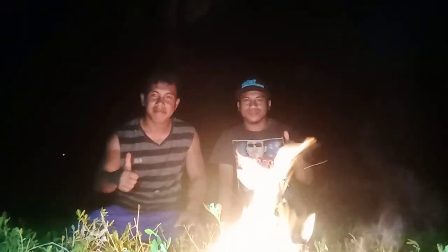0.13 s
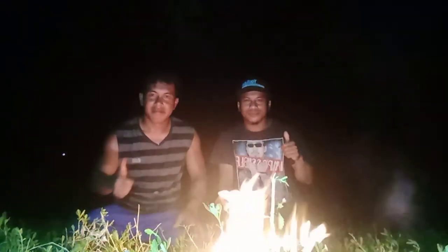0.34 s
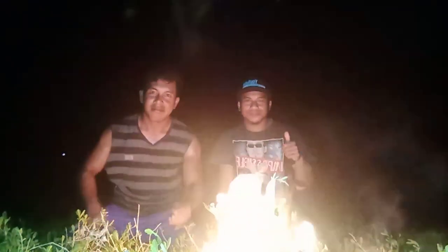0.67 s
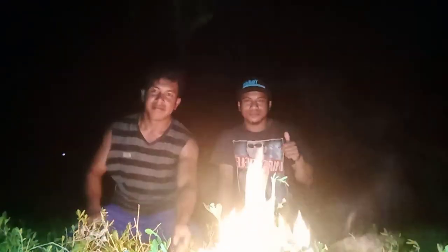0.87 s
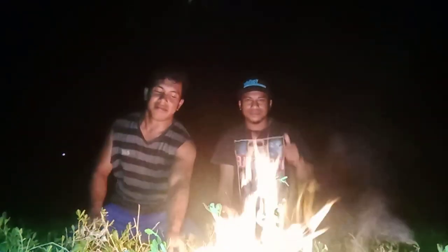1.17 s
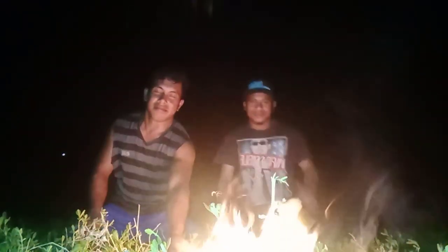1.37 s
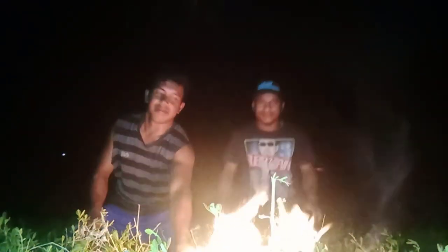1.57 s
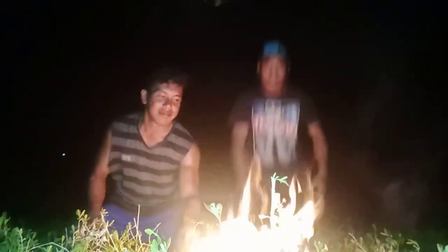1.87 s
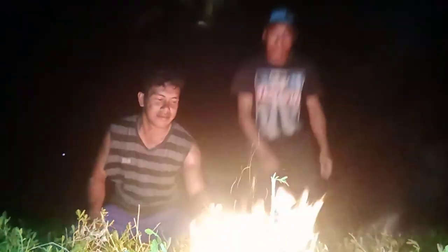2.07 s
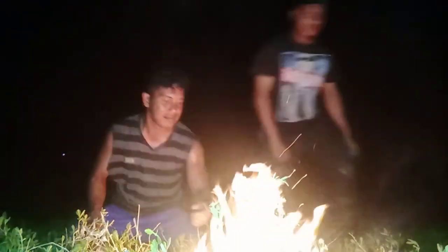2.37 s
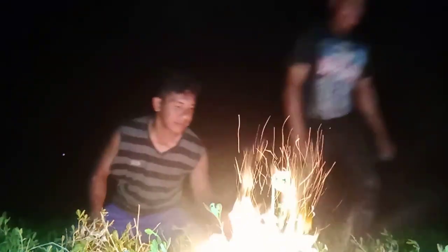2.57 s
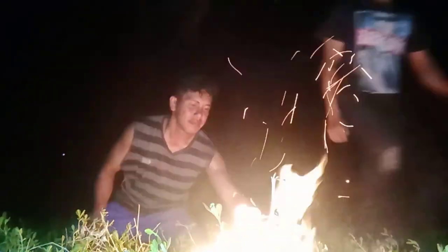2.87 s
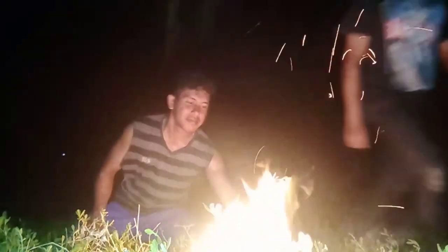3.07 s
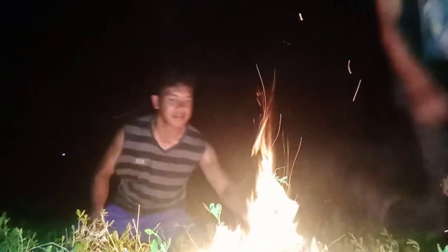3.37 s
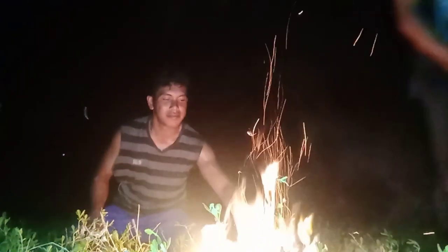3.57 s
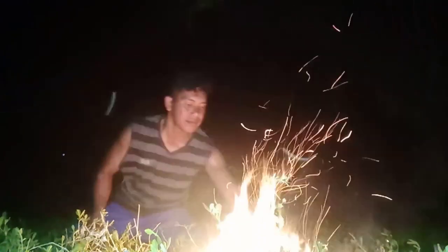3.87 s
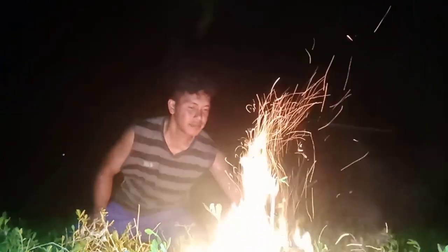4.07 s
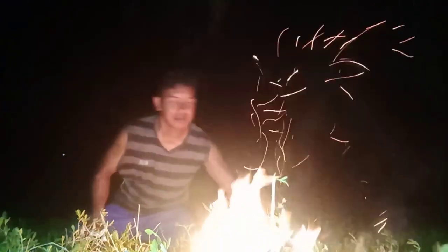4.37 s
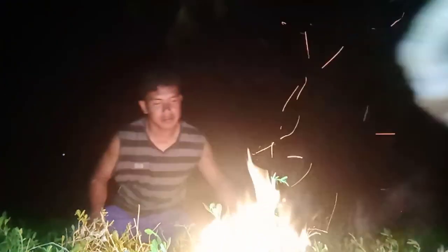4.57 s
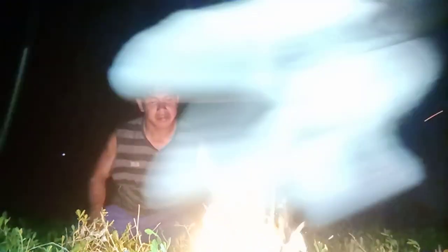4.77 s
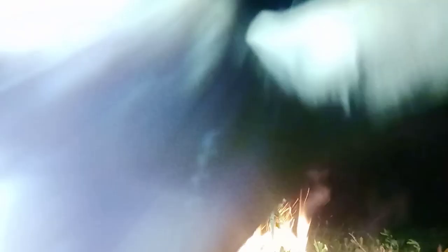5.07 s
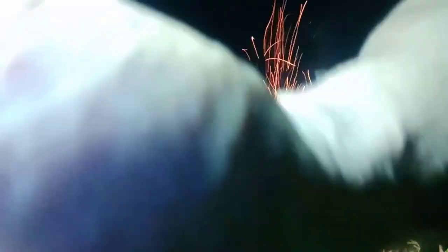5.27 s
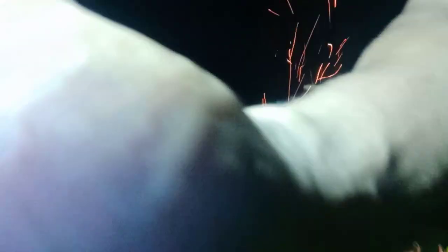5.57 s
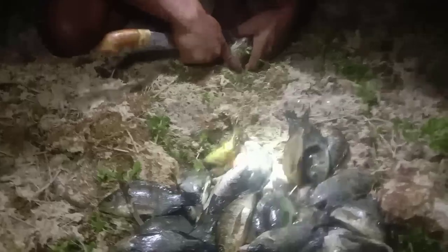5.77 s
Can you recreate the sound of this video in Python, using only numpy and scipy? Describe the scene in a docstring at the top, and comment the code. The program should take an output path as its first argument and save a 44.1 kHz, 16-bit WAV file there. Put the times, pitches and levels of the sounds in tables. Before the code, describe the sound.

A small grass and wood fire crackles close by with sharp pops and snaps while crickets and katydids sing steadily through the night.

```python
"""A grass and wood fire burns close to the microphone at night: stems burst as sharp pressure steps,
twigs snap as short rings, sap squeaks in gliding tones and sizzles in tiny crackles, and flames
flutter as resonant noise over a rumble. Crickets and katydids sing all around in gliding wing
strokes, pulsed buzzes and a noise chorus. Gain control ducks after the loudest bursts.
Near the end the sound stops dead, and the same night fades in again."""
import sys
import numpy as np
from scipy import signal
from scipy.fft import rfft, irfft
from scipy.io import wavfile
from scipy.ndimage import uniform_filter1d

SR = 44100
rng = np.random.default_rng(int(sys.argv[2]) if len(sys.argv) > 2 else 0)


def gain_from_db(level_db):
    """Convert decibel levels to linear amplitude factors (20 dB per decade)."""
    decades = np.asarray(level_db, float) / 20
    return 10 ** decades


def waveform_to_disk(signal):
    """Save audio, clipped to [-1, 1], as 16-bit WAV at the path in sys.argv[1]."""
    frames = np.transpose(np.atleast_2d(signal))
    scaled = np.clip(frames, -1, 1) * 32767
    samples = np.round(scaled).astype(np.int16)
    wavfile.write(sys.argv[1], SR, samples)


N = 261502
TIME = np.arange(N) / SR  # seconds


def evened(x):
    """Scales a sound to an rms of 1."""
    return x / np.sqrt(np.mean(x ** 2) + 1e-20)


def smooth_noise(size):
    """Slowly wandering noise of rms 1, averaged over size samples."""
    return evened(uniform_filter1d(rng.standard_normal(N), size=size))


def over_time(points):
    """Joins (time, value) points with straight lines."""
    return np.interp(TIME, *np.transpose(points))


def read(points, hz):
    """Reads a spectrum at the given frequencies, on a log frequency scale."""
    f, value = np.transpose(points)
    return np.interp(np.log(hz + 1), np.log(f + 1), value)


def coloured(x, points):
    """Filters a sound by a spectrum in dB."""
    spectrum = rfft(x) * gain_from_db(read(points, np.fft.rfftfreq(N, 1 / SR)))
    return irfft(spectrum, N)


def add(mix, s, sound):
    """Mixes a sound in, its middle at time s."""
    first = round(s * SR) - len(sound) // 2
    part = mix[first:][:len(sound)]
    part += sound[:len(part)]


def resonate(x, hz, width):
    """A resonance that can glide: shifts hz down to zero, smooths twice, and shifts back."""
    turn = np.exp(2j * np.pi * np.cumsum(hz * np.ones(N)) / SR)
    r = np.exp(-np.pi * width / SR)
    smooth = signal.lfilter([(1 - r) ** 2], [1, -2 * r, r ** 2], x / turn)
    return 2 * (turn * smooth).real


def patchy(tone, patch_db, flicker_db):
    """Noise whose spectrum has drifting patches and a flicker shared by all bands."""
    frames, hz = N // 128 + 5, np.fft.rfftfreq(512, 1 / SR)
    a, b, patches = rng.standard_normal((frames, 257, 3)).T
    patches = uniform_filter1d(patches, size=6, axis=0)  # across frequency
    patches = evened(uniform_filter1d(patches, size=12, axis=1))  # across time
    flicker = evened(uniform_filter1d(rng.standard_normal(frames), size=3))
    level_db = read(tone, hz)[:, None] + patch_db * patches + flicker_db * flicker
    z = (a + 1j * b) * gain_from_db(level_db)
    return evened(signal.istft(z, nperseg=512, noverlap=384)[1][:N])


def ring(hz, rise_ms, fall_ms, phase):
    """A short ring that swells and dies exponentially, peaking in the middle of its array."""
    ms = np.arange(-500, 500) / SR * 1000
    envelope = np.exp(np.where(ms < 0, ms / rise_ms, -ms / fall_ms))
    return envelope * np.cos(2 * np.pi * (hz * ms / 1000 + phase))


def stroke(from_hz, to_hz, ms):
    """A gliding tone that swells and fades, as from one stroke of an insect's wing."""
    size = round(ms * SR / 1000)
    cycles = np.cumsum(np.linspace(from_hz, to_hz, size)) / SR
    return np.hanning(size) * np.sin(2 * np.pi * (cycles + rng.random()))


# Bursting stems, the rows at 3.1229 and 3.1257 s being faint echoes of the burst at 3.1163 s: (time [s],
# strength [dB], wait until the pressure swings back [ms], size of the swing back [share of the first step])
STEM_BURSTS = [(.9240, 1, .31, .68), (2.0108, -5.5, .18, 1), (2.0181, .5, .15, .69),
               (3.1163, 1.2, .315, .71), (3.1229, -13, .3, .7), (3.1257, -9, .2, .7)]


def bursts():
    """A sharp pressure step and its swing back, each a spike ringing in the microphone port over a slower body."""
    out = np.zeros(N)
    spike = 0.35 * ring(4700, .07, .14, 0)
    body = 0.45 * ring(300, .1, 0.36, 0)
    port = .045 * ring(14900, .2, .3, 0)
    step = spike + body + port
    for s, db, ms, back in STEM_BURSTS:
        add(out, s, -gain_from_db(db) * step)
        add(out, s + ms / 1000, back * gain_from_db(db) * step)
        add(out, s + .001, gain_from_db(db - 27.5) * ring(2420, 0.41, 1.9, 0))  # the stick rings on
        add(out, s + 0.0046, gain_from_db(db - 32.5) * ring(150, 4.2, 2.2, 0))  # the ground booms
    return signal.lfilter(*signal.butter(2, 70, "high", fs=SR), out)  # the pressure evens out


# Snaps at set times, loud and faint: (time [s], strength [dB], slowness that lengthens ring and
# tearing [ms], thump relative to the ring [dB], tick relative to the ring [dB])
TIMED_SNAPS = [(.0833, -31.5, .33, -25, -21), (.1152, -29, 1.12, -44, -30), (.1648, -28, .24, -28.5, -6.5),
               (.2446, -43, 1.3, -44, -5), (.506, -41, 0.87, -39, 2), (.7134, -47, 0.48, -39, 17),
               (.7179, -30, 0.29, -44, 11), (.72, -35.5, .3, -42, 12.5), (.7284, -28, 0.61, -43, -5),
               (.731, -38, 0.69, -43, 13.5), (1.606, -27, 0.54, -25, -12), (1.6587, -28, 0.82, -49, -21),
               (1.6653, -31.5, 0.6, -55, -17), (1.7796, -37, .43, -44.5, -20),
               (1.8411, -28.5, 1.14, -49, -4.5), (1.9526, -31.5, 0.35, -46, -29),
               (2.0083, -26.5, 0.46, 5, 6.5), (2.0203, -36, 0.35, 10, -33), (2.0766, -32, .29, -15.5, -10),
               (2.2552, -22.5, 0.93, -55, -11), (2.258, -29, 0.84, -49, -8), (2.2769, -41, 1.1, -38, -4),
               (2.302, -24.5, 0.55, -38, -21), (2.3216, -26.5, .23, -7, 3), (2.3289, -13, 0.057, -12, -7.5),
               (2.5588, -59.5, .2, -28, 24), (2.5701, -53, .23, -25, 14), (3.0352, -34, 0.28, -21, -24),
               (3.0651, -27, 0.66, -22, -31), (3.0751, -25, 0.37, -19, -27),
               (3.0916, -25.5, 0.93, -19, -12), (3.1795, -17.5, 0.98, -44, -25),
               (3.2041, -8, 0.41, -40, -40), (3.2098, -16.5, 0.43, -35.5, -22),
               (3.3968, -29, 0.96, -51, -11), (3.4874, -27.5, 1, -37, -9), (3.5444, -59, 0.68, -3, -17),
               (3.561, -52, 0.58, -5, -33), (3.6414, -33, 0.5, -29, -28), (3.7474, -28.5, 2.1, -18.5, -36),
               (3.8181, -31, 0.41, -42, -28), (3.8658, -35, .33, -26, 1), (3.871, -18, .23, -22, 4),
               (3.878, -11.5, 0.18, -14.5, -3.5), (3.8788, -8, 0.62, -49, -33),
               (3.887, -24, 0.27, -34, -17), (3.8961, -23.5, 0.46, -53, -9), (4.0113, -8.5, 0.13, -61, -20),
               (4.0153, -22.5, 0.37, -58, 0), (4.109, -17, 0.75, -44, -35), (4.1459, -24.5, .7, -43, -29),
               (4.3046, -6.5, 0.71, -5.5, -42), (4.3077, -6, 0.96, -14, -10), (4.3112, -13, 1.2, -10, -47),
               (4.3137, -17, 2.3, -27, -43), (4.3245, -20, 3, -11.5, -34), (4.3423, -46, 2.1, -2, -23),
               (4.3898, -25, 0.58, -20, -6), (4.407, -31, 0.69, -5, -2), (4.4764, -43, .24, -33, 2),
               (4.5463, -23.5, 0.28, -28, -8), (4.628, -26, .64, -52, -9), (4.647, -37, .35, -41, -28),
               (4.711, -41, .32, -40, 3), (4.8306, -33, 3.6, -14, -26), (4.87, -23, .74, -13, -50),
               (4.8737, -27.5, 3, -8, -27), (4.9735, -35.5, 2.2, -14, -23), (4.978, -31.5, 1.56, -7.5, -12),
               (5.0098, -32, 2.8, -16, -10), (5.192, -36.5, .3, -10, -16), (5.343, -32, 1.9, -18.5, -3.5),
               (5.38, -34, 2.6, -39, -37), (5.3867, -28, 1.74, -50, -15), (5.615, -20, 0.12, -31, -7.5),
               (5.619, -24.5, 0.42, -32, -12.5), (5.8719, -39, .92, -28, -14),
               (5.9082, -29.5, 0.6, -27, -11)]
# How sticks ring in a thump: (frequency [Hz], highest level within the thump [dB], decay [ms])
STICK_RINGS = [(430, -12.5, 1.1), (666, -6, 1.1), (1050, -8.5, .15), (1740, -5.5, 0.15), (2510, 3, 0.66)]
SNAP_HZ, SNAP_SPREAD_HZ = 5700, 1000  # middle and full width of the range in which fibres ring


def snaps():
    """Each snap is a thump in the sticks, a ring and a thin tick; slow ones tear as a rasp of many fibres."""
    out = np.zeros(N)
    rows = TIMED_SNAPS + chance_snaps()
    draws = zip(rng.random((len(rows), 13)), rng.standard_normal((len(rows), 1000)))
    for (s, db, ms, thump_db, tick_db), (luck, fibres) in zip(rows, draws):
        hz = SNAP_HZ + SNAP_SPREAD_HZ * (luck[12] - .5)
        snap = ring(hz, 0.14 + .05 * ms, 0.14 + 0.048 * ms, luck[10])
        for k, (wood_hz, wood_db, wood_ms) in enumerate(STICK_RINGS):
            level_db = thump_db + wood_db - 10 * luck[k + 5]
            snap += gain_from_db(level_db) * ring(wood_hz, 0.21, wood_ms, luck[k])
        port = .5 * gain_from_db(0.91 * min(tick_db, 8))  # bright ticks ring the microphone port harder
        tick = port * ring(14800, .2, 0.353, luck[11]) + 0.58 * ring(10300, .07, 0.084, luck[11])
        snap += gain_from_db(tick_db) * tick
        tearing = np.clip(1.14 * (ms - .35), 0, 1)  # 0 is one clean break, 1 is a full rasp
        breaks = fibres * ring(0, .3 * ms, 1.2 * ms, 0)  # at 0 Hz the ring is a plain envelope
        breaks *= tearing * np.sqrt(3 * ms) / np.linalg.norm(breaks)
        breaks[500] += 1 - .9 * tearing  # the main break, in the middle
        add(out, s, gain_from_db(db) * signal.fftconvolve(snap, breaks, "same"))
    # a noisy tail that falls 60 dB in 20 ms
    trail = rng.standard_normal(1500) * gain_from_db(-60 * np.arange(1500) / SR / 0.02)
    out = out + gain_from_db(-31.5) * signal.oaconvolve(out, trail)[:N]
    return signal.lfilter(*signal.butter(2, 120, "high", fs=SR), out)  # thin sticks push little bass


CHANCE_SNAPS = 60  # how many
CHANCE_DB, CHANCE_SPREAD_DB = -36.5, 9  # middle strength in a middling fire, full width of the spread
CHANCE_FOLLOW = .4  # dB of strength per dB of sizzle


def chance_snaps():
    """Rows for the many other snaps, at chance moments and of chance colour, stronger with the sizzle."""
    when, size, ms, thump, tick = rng.random((CHANCE_SNAPS, 5)).T
    s = .02 + when * (N / SR - .04)
    db = CHANCE_DB + CHANCE_FOLLOW * activity_db(s) + CHANCE_SPREAD_DB * (size - .5)
    return list(zip(s, db, 0.46 + 0.4 * ms ** 2, -45 + 30 * thump, -28 + 20.1 * tick))


# Sap squeaking out of hot wood: (time [s], length [ms], start pitch [Hz], end pitch [Hz],
# level before the sputter [dB])
SAP_SQUEAKS = [(1.968, 36, 3750, 3270, -54.5), (1.976, 71, 2550, 2400, -58), (2.435, 19, 2990, 3300, -50),
               (2.454, 20, 3265, 3460, -43.5), (2.476, 17, 3580, 3470, -50.5),
               (3.075, 11, 1320, 1200, -45.5), (3.554, 30, 2560, 2480, -55), (3.560, 42, 1156, 1310, -61)]


def squeaks():
    """Short gliding whistles, chopped by sputtering steam."""
    out = np.zeros(N)
    for s, ms, from_hz, to_hz, db in SAP_SQUEAKS:
        add(out, s, gain_from_db(db) * stroke(from_hz, to_hz, ms))
    return out * (.6 + 0.53 * smooth_noise(70))


# Sap and grass sizzling: (time [s], level before the 11 dB lift in sizzle() [dB])
SIZZLE_LEVEL = [(0, -83), (1.3, -85), (1.75, -76), (2.15, -75.5), (2.31, -64), (2.4, -69.5), (2.55, -76),
                (2.68, -67.5), (2.9, -78.5), (3.06, -63.5), (3.2, -51.5), (3.32, -71.5), (3.68, -58),
                (4, -69.5), (4.24, -56.5), (4.48, -64), (4.6, -63), (4.82, -54.5), (4.94, -63.5),
                (5.05, -62.5), (5.28, -77.5), (5.36, -63.5), (5.52, -85), (5.93, -72)]
# Colour of the sizzle: (frequency [Hz], relative level [dB])
SIZZLE_COLOUR = [(410, -42), (700, -14.5), (931, -21), (1270, -20), (1850, -22), (2430, -12), (3360, -9),
                 (4830, -4), (5640, -4), (6500, -4.5), (8000, -18), (12400, -30), (15500, -28)]


def sizzle():
    """Tiny crackles, a few of them large, over the hiss of steam."""
    size = gain_from_db(5 * np.minimum(rng.exponential(1, N), 4))
    size = size * (rng.random(N) < 2500 / SR)  # about 2500 crackles a second
    kind, crackle = rng.integers(0, 12, N), np.zeros(N)
    for k in range(12):
        grain = ring(rng.uniform(2500, 14000), 0.12, rng.uniform(0.072, 0.28), rng.random())
        crackle += signal.oaconvolve(size * (kind == k), grain)[:N]
    crackle = evened(coloured(crackle, SIZZLE_COLOUR))
    steam = patchy(SIZZLE_COLOUR, 2.5, 1.5)
    spits = gain_from_db(2.2 * smooth_noise(2500))  # the level wanders
    return gain_from_db(over_time(SIZZLE_LEVEL) + 11) * spits * (.75 * crackle + .66 * steam)


def activity_db(s):
    """How far the sizzle is above or below a middling fire at time s."""
    return np.interp(s, *np.transpose(SIZZLE_LEVEL)) + 65


# Gas puffs: (time of the peak [s], length [ms], pitch [Hz], peak level [dB])
GAS_PUFFS = [(.13, 86, 514, -80), (1.945, 96, 451, -62), (2.25, 210, 448, -77), (2.41, 80, 483, -74),
             (3.03, 44, 580, -73), (3.25, 27, 360, -61), (3.548, 59, 511, -63), (3.64, 67, 430, -64),
             (3.75, 42, 404, -55), (3.83, 75, 554, -72), (4.21, 210, 522, -62.5), (4.35, 120, 665, -66.5),
             (4.54, 110, 556, -68), (4.795, 40.4, 372, -52), (4.87, 80, 402, -62), (5.85, 136, 560, -69.5)]
PUFF_RISE = .4  # rise time as a share of the fall time
MURMUR_DB, MURMUR_FOLLOW = -78, .6  # flutter between puffs in a middling fire; dB per dB of sizzle
# Flame rumble: (time [s], level [dB])
RUMBLE_LEVEL = [(0, -68.5), (.8, -73), (1.9, -69), (2.5, -69.5), (3.3, -66.5), (4, -73.5), (4.4, -69.5),
                (5.2, -69), (5.93, -72)]
# Colour of the rumble: (frequency [Hz], relative level [dB])
RUMBLE_COLOUR = [(15, -59.5), (25, -22), (37, -11), (109, 0.5), (267, -13.5), (350, -17), (389, -22.5),
                 (900, -35), (1170, -67), (1980, -120)]


def flames():
    """A lumpy rumble, and a hollow flutter where gas puffs out between the sticks."""
    s, ms, hz, db = np.transpose(GAS_PUFFS)
    level = gain_from_db(MURMUR_DB + MURMUR_FOLLOW * activity_db(TIME))
    for at, length, peak in zip(s, ms / 1000, gain_from_db(db)):
        width = length * np.where(TIME < at, PUFF_RISE, 1)
        level = level + peak * np.exp(-(2 * (TIME - at) / width) ** 2)
    pitch = np.interp(TIME, s, hz) + 40 * smooth_noise(2000)  # Hz, wandering
    unsteady = gain_from_db(4 * smooth_noise(350))
    flutter = evened(unsteady * resonate(rng.standard_normal(N), pitch, 170))
    lumps = gain_from_db(1.4 * smooth_noise(1500))
    slow = uniform_filter1d(uniform_filter1d(rng.standard_normal(N), size=3000), size=2000)
    gusts = gain_from_db(3 * evened(slow))
    rumble = evened(gusts * lumps * coloured(rng.standard_normal(N), RUMBLE_COLOUR))
    return gain_from_db(over_time(RUMBLE_LEVEL)) * rumble + level * flutter


# Near cricket: (time of the first stroke [s], strokes [count], middle level [dB])
NEAR_CHIRPS = [(0.116, 3, -50.5), (0.304, 6, -52), (.518, 3, -53.5), (.646, 3, -52), (.792, 3, -51.5),
               (1.092, 3, -48.5), (1.230, 3, -51), (1.346, 2, -52), (1.473, 3, -51.5), (1.681, 3, -51),
               (1.883, 3, -51), (2.129, 3, -48.5), (2.302, 3, -46.5), (2.491, 3, -47.5), (2.686, 3, -50.5),
               (2.886, 3, -53), (3.245, 5, -51.5), (3.444, 3, -53), (3.644, 3, -46.5), (3.850, 3, -64),
               (4.063, 3, -46.5), (4.768, 3, -64), (5.08, 4, -50), (5.269, 3, -50), (5.500, 3, -51),
               (5.809, 4, -52.5)]


def near_cricket():
    """Chirps made of wing strokes 35 ms apart, each falling in pitch."""
    out = np.zeros(N)
    for s, strokes, db in NEAR_CHIRPS:
        for k in range(round(strokes)):
            add(out, s + 0.035 * k, gain_from_db(db + rng.normal(0, 1.6)) * stroke(5150, 4410, 22))
    return out


# High cricket: (time [s], stroke pairs sung so far [count])
PAIR_COUNT = [(.029, 0), (1.013, 15), (1.536, 23), (1.991, 30), (2.528, 38), (2.986, 45), (5.239, 80),
              (5.955, 91)]


def high_cricket():
    """Rising wing strokes in pairs, 16.5 ms from one stroke to its partner."""
    out = np.zeros(N)
    s, pairs = np.transpose(PAIR_COUNT)
    for start in np.interp(np.arange(91), pairs, s):
        db = -55.5 + rng.normal(0, 3)
        for lag in (0, .0165):
            add(out, start + lag, gain_from_db(db + rng.normal(0, 1)) * stroke(6800, 7250, 10))
    return out


# Steady buzzers: (pitch [Hz], width [Hz], pulse rate [per s], time of one pulse [s],
# pulse sharpness [no unit], level before any swell [dB])
BUZZING_INSECTS = [(2400, 90, 250, -0.027, 0.89, -76), (14700, 510, 66, -0.013, 1.0, -79)]
# Swell of the low buzzer: (time [s], level change [dB])
LOW_BUZZ_SWELL = [(0, -4.5), (1.3, -5.5), (1.55, 3.5), (1.9, -5), (2.15, -14.5), (3.5, 1.5), (5.5, -2.5),
                  (5.75, 2.5)]


def buzzers():
    """Noise in regular pulses rings a narrow resonance; only the low buzzer swells."""
    out = np.zeros(N)
    for hz, width, rate, first, sharp, db in BUZZING_INSECTS:
        beat = np.exp(sharp * np.cos(2 * np.pi * rate * (TIME - first)))
        swell_db = over_time(LOW_BUZZ_SWELL) * (hz < 8000)
        out += gain_from_db(db + swell_db) * evened(resonate(beat * rng.standard_normal(N), hz, width))
    return out


def neighbours():
    """500 single falling strokes at chance moments, from crickets further off."""
    out = np.zeros(N)
    for s in rng.uniform(.02, N / SR - .03, 500):
        from_hz, to_hz = rng.normal(0, 300) + np.array([5500, 4850])
        add(out, s, gain_from_db(-59 + rng.normal(0, 1.7)) * stroke(from_hz, to_hz, 20))
    return out


# Colour of the far insects: (frequency [Hz], relative level [dB])
CHORUS_COLOUR = [(350, -63), (600, -36), (1670, -33), (1940, -41), (2380, -19), (2800, -24.5),
                 (3730, -20.5), (4900, 0.5), (5310, -2), (7270, -11), (8000, -16), (8800, -12.5),
                 (10900, -33.5), (13400, -38), (15600, -26)]


def far_chorus():
    """Far insects blend into coloured noise with drifting patches."""
    return gain_from_db(-55.5) * patchy(CHORUS_COLOUR, 2.2, .6)


# Colour of the faint steady hiss that is opposite in left and right:
# (frequency [Hz], relative level [dB])
SIDE_COLOUR = [(24, -47), (40, -14.5), (166, -3.5), (1820, -16.5), (3930, -7), (4680, -15.5), (5050, -18.5),
               (6640, -8), (7160, -37), (9890, -27), (15500, -7.5)]
# How much of the sound goes, opposite, to left and right: (frequency [Hz], level [dB])
SIDE_SHARE = [(100, -39), (500, -38), (1200, -32), (4500, -37.5), (8000, -38), (14000, -20.5)]


def stereo_side(mid):
    """A faint hiss and a little of the sound turned a quarter cycle, opposite in left and right."""
    hiss = gain_from_db(-73.5) * patchy(SIDE_COLOUR, 3.7, 0.96)
    return hiss + signal.hilbert(coloured(mid, SIDE_SHARE)).imag


def scene():
    """Fire and insects together, nearly mono."""
    fire = bursts() + snaps() + squeaks() + sizzle() + flames()
    insects = near_cricket() + high_cricket() + buzzers() + neighbours() + far_chorus()
    mid = fire + insects
    side = stereo_side(mid)
    return np.array([mid + side, mid - side])


def gain_control(dry):
    """Turns the sound down just after heavy bursts, then lets it creep back."""
    heavy = uniform_filter1d(dry.mean(0), size=10)  # it listens mostly to the low end
    power_db = 10 * np.log10(abs(uniform_filter1d(heavy ** 2, size=200)) + 1e-12)
    fall = TIME * 70  # the remembered level falls 70 dB a second
    held_db = np.maximum.accumulate(power_db + fall) - fall
    over_db = np.maximum(held_db + 32.5, 0)  # excess above -32.5 dB
    late_db = np.concatenate([np.zeros(250), over_db])[:N]  # it reacts after the burst has passed
    return dry / gain_from_db(1.3 * uniform_filter1d(late_db, size=100))


def roll_off(x):
    """The treble ends steeply here."""
    return signal.sosfilt(signal.butter(12, 16810, fs=SR, output="sos"), x)


STOP_S, RESUME_S, FULL_S = 5.670, 5.722, 5.867  # sound stops, starts to fade in, is full again


def record(dry):
    """Gain control, preamplifier hiss, a band limit, a silent break with a fade-in, and a small offset."""
    x = gain_control(dry)
    x += gain_from_db(-91.5) * rng.standard_normal(N)  # preamplifier hiss
    edge = [(15550, 0), (15700, -18), (16700, -20), (17000, -70)]  # (frequency [Hz], level [dB])
    x = np.array([coloured(channel, edge) for channel in x])
    fade_in = np.clip((TIME - RESUME_S) / (FULL_S - RESUME_S), 0, 1) ** 1.3
    fade = np.where(TIME < STOP_S, 1, fade_in)
    finished = x * fade - .0002  # converter offset
    return roll_off(finished)


dry = scene()
out = record(dry)
waveform_to_disk(out)
```